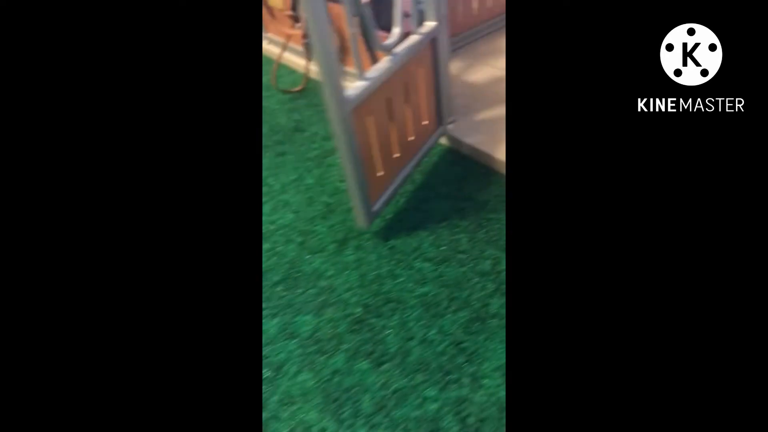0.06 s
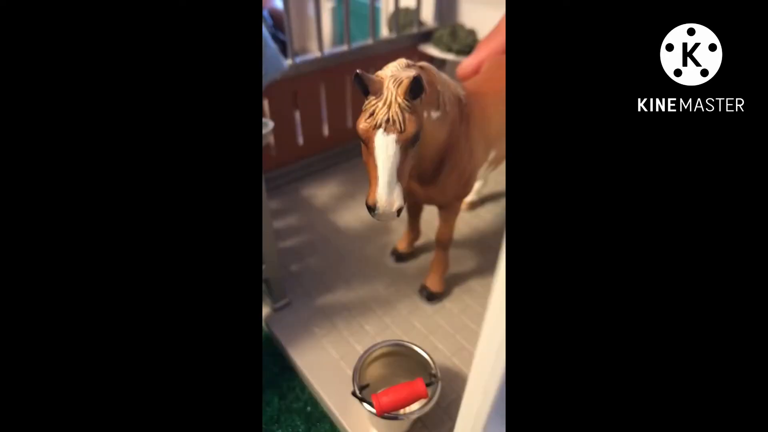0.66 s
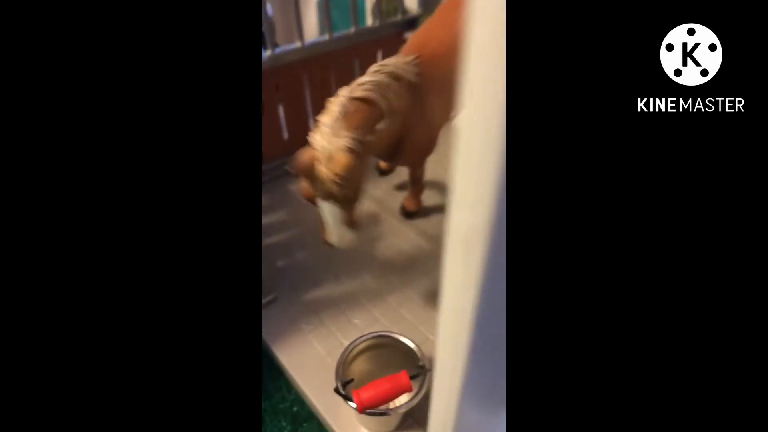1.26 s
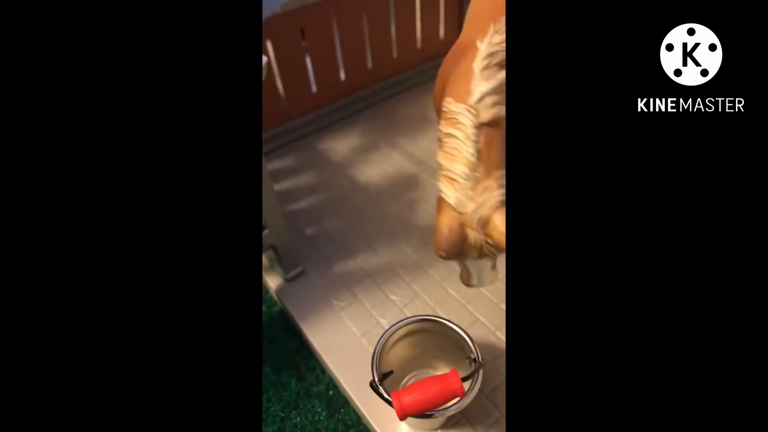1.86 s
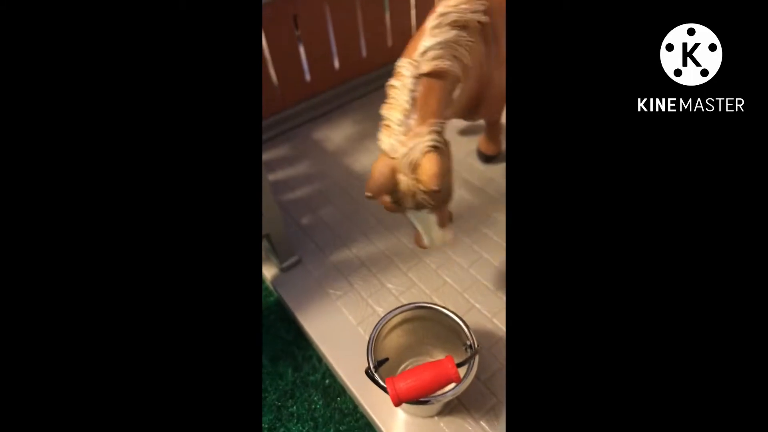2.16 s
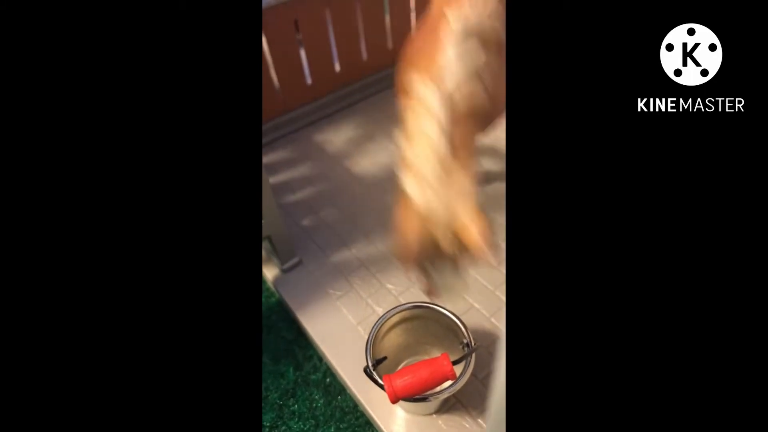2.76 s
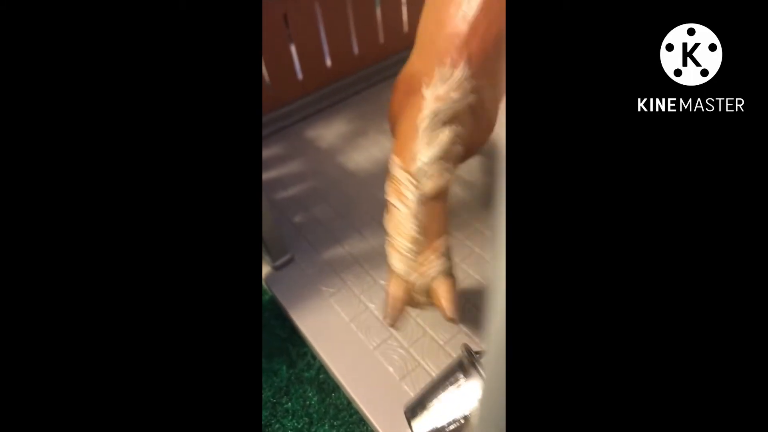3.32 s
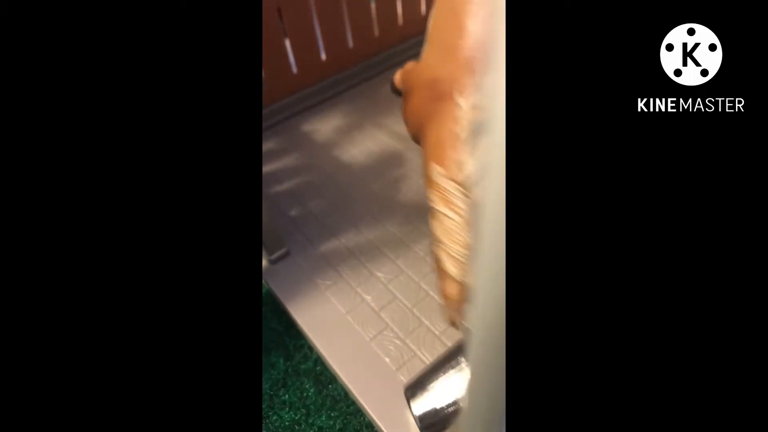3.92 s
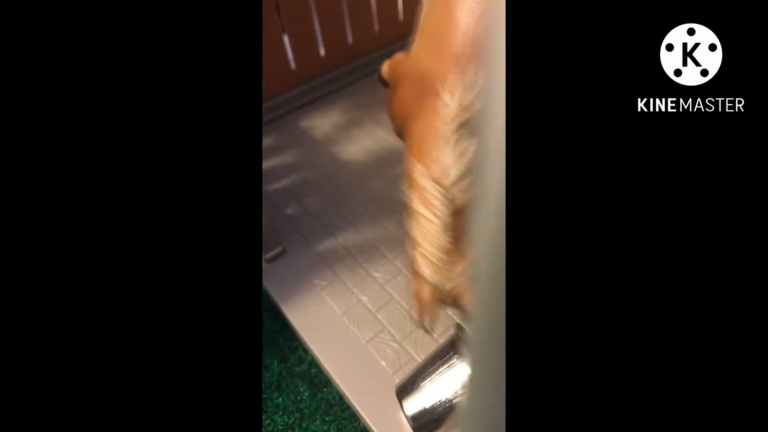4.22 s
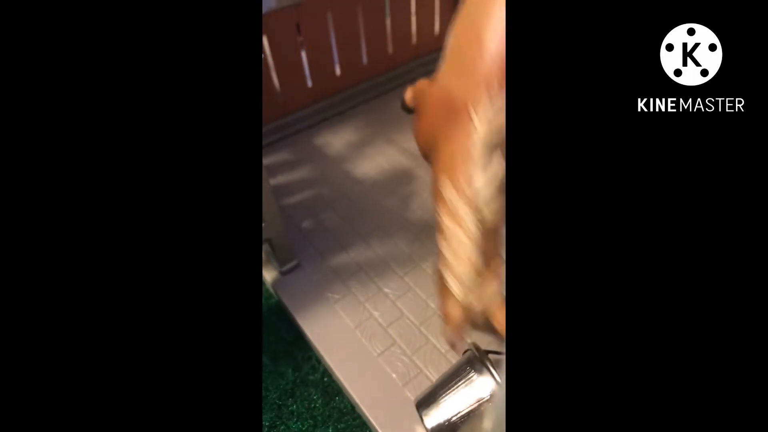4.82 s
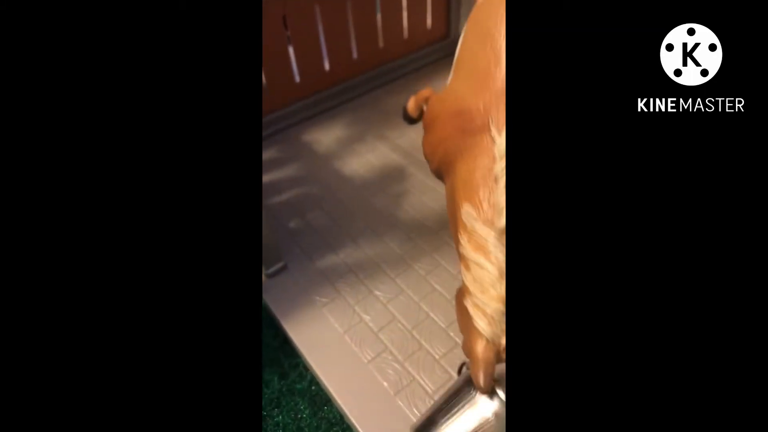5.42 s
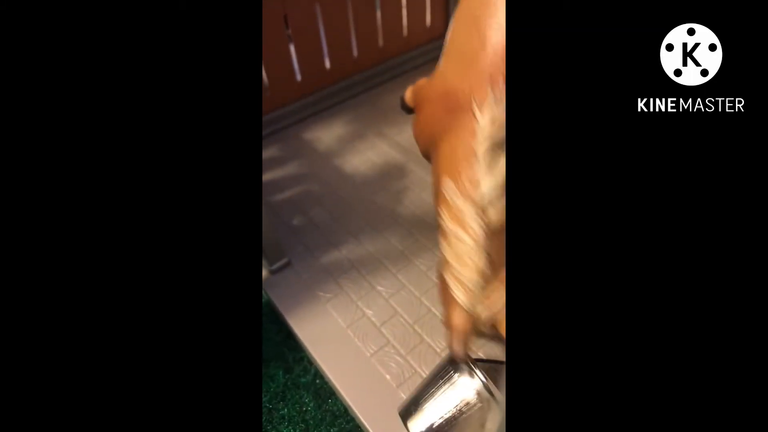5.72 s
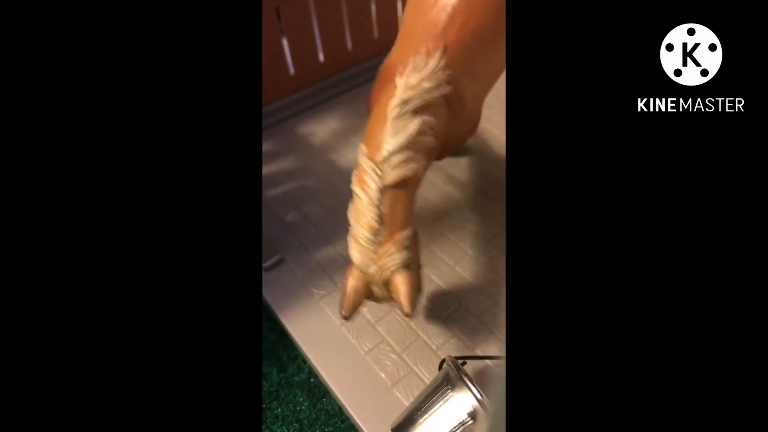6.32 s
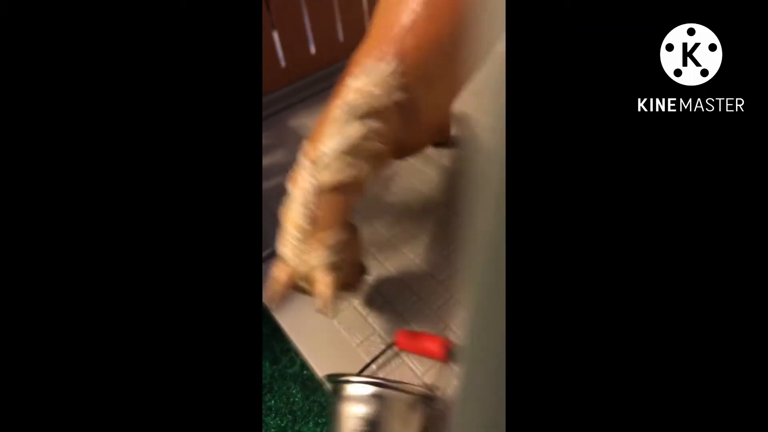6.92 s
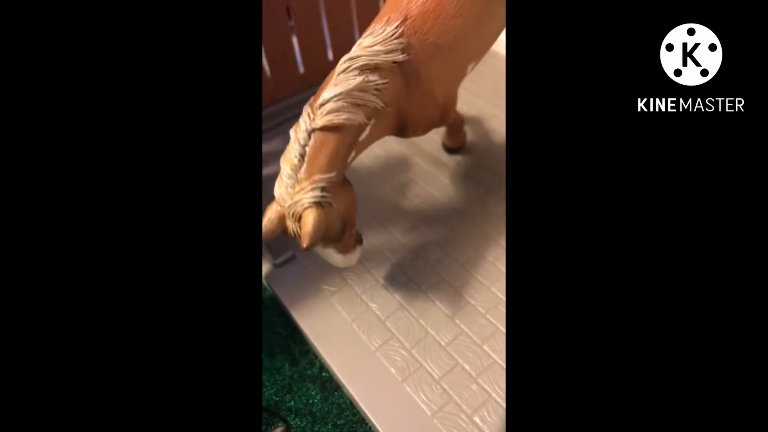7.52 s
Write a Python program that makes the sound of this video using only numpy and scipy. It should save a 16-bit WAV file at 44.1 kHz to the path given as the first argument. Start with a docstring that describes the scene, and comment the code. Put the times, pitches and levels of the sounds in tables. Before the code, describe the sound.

A plastic toy horse is walked over a hollow toy stable floor, its hooves clacking and dragging softly. After about three seconds it butts a small metal bucket over and keeps shoving it, making a run of sharp, irregular clanks with light thumps. The bucket rocks and its wire handle clinks brightly, then a few faint taps finish. The sound is close, in a small room with faint hum and hiss.

```python
"""A toy stable in a small furnished room, over faint hum and hiss. A plastic horse is walked across the
hollow floor, hooves clacking and dragging, a hand brushing its shell, the table rumbling underneath.
It butts a small metal bucket over and shoves it about: each blow thumps the floor, clanks the wall,
cracks on the rim and rebounds. Between blows the bucket rocks, and its loose wire handle clinks
with a very high shimmer."""
import sys
import numpy as np
from scipy import signal
from scipy.fft import rfft, irfft, next_fast_len
from scipy.io import wavfile
from scipy.ndimage import uniform_filter1d

SR = 44100
rng = np.random.default_rng(int(sys.argv[2]) if len(sys.argv) > 2 else 0)


def persist_wave(psi):
    """Save psi, clipped to +-1, as 16-bit WAV."""
    counts = np.round(np.clip(psi, -1, 1) * 32767).astype(np.int16)
    wavfile.write(sys.argv[1], SR, np.atleast_2d(counts).T)


N = 333881
T = np.arange(N) / SR
AGE = np.arange(SR // 3) / SR  # seconds since a hit

# plastic edges catching: (time [s], level [dB])
TICKS = [(0.169, -60), (0.807, -52), (1.356, -45.5), (1.78, -47.5), (2.59, -31), (2.658, -42), (2.739, -36),
         (3.642, -44.5), (3.743, -45), (5.234, -36.5), (6.622, -42), (6.716, -55), (6.942, -49.5)]
# hooves dragging, hand brushing: (time [s], length [s], drag [dB], brush [dB])
RUBS = [(.855, 0.16, -44, -53.5), (1.2, 0.35, -50.5, -63.5), (1.638, 0.24, -46.5, -55.5),
        (1.95, 0.53, -66.5, -65.5), (2.359, .12, -48.5, -56.5), (2.507, 0.18, -44, -59.5),
        (2.878, 0.45, -45, -65.5), (3.6, .5, -50.5, -78.5), (5.201, 0.17, -41.5, -55.5),
        (5.952, 0.089, -47, -72), (6.918, 0.17, -50.5, -64)]
# hoof steps: (time [s], clack [dB], thump gain [dB])
STEPS = [(.89, -36, -38), (.918, -41, -43), (.94, -59, -41), (1.019, -31.5, -37), (1.066, -30, -34.5),
         (1.114, -34.5, -34), (1.193, -33, -36.5), (1.246, -30, -31), (1.281, -40, -42),
         (1.494, -25, -24.5), (1.554, -43.5, -37.5), (1.824, -27, -25.5), (1.888, -33, -32.5),
         (2.574, -26.5, -33.5), (2.74, -38.5, -37), (3.242, -37.5, -39), (3.277, -24, -30.5),
         (3.292, -33, -37), (3.352, -42, -35.5), (3.412, -37, -46), (3.421, -31.5, -24.5),
         (3.797, -42.5, -40.5), (3.844, -44, -34.5), (3.906, -29, -32.5), (3.919, -26, -33.5),
         (3.995, -32.5, -40.5), (4.76, -39, -48), (5.522, -31.5, -62), (6.031, -41, -47.5),
         (6.622, -37.5, -32), (7.028, -40.5, -63.5), (7.069, -39, -63), (7.17, -39.5, -49)]
# muzzle on bucket; hardness is the rim's crack over the wall's clank: (time [s], level [dB],
# hardness [dB], thump gain [dB], handle [dB], rebound delay [s], rebound re blow [dB])
BLOWS = [(2.8265, -12, 1.5, -19, -23, .018, -4.5), (3.546, -15, -2.5, -17, -21.5, .025, -12),
         (4.251, -6.5, -5.5, -6, -33.5, .019, -17), (4.45, -10.5, -5, -11, -42.5, .019, -19),
         (4.651, -16.5, -5.5, -15.5, -34.5, .058, -12.5), (4.877, -14, -2.5, -17.5, -24, .013, -0.2),
         (5.136, -17.5, 1, -28, -26.5, .016, 5), (5.436, -15, 3, -23, -23.5, .016, 4.5),
         (5.65, -12, 0.5, -19, -27, .01, -12), (5.84, -10, -0.5, -16.5, -26, .009, -4.5),
         (6.443, -13, 4, -22, -15.5, .013, -3.5), (6.801, -22, -6, -16.5, -32, 0.012, 1)]
# the bucket rocking on the floor: (time [s], level [dB], hardness [dB])
KNOCKS = [(2.862, -29.5, 1), (2.917, -26, -10), (2.942, -37.5, -3.5), (2.975, -20.5, 6.5),
          (3.04, -30.5, -9), (3.052, -33.5, 7.5), (3.136, -30.5, -4.5), (3.145, -28.5, -7),
          (3.541, -35, -8), (3.874, -15.5, -5.5), (3.933, -16, -7.5), (4.327, -27.5, -4),
          (4.345, -25.5, -15.5), (5.256, -23, -3), (5.291, -22.5, -5.5), (5.309, -17.5, -4.5),
          (5.39, -16, -2.5), (5.547, -25, -9.5), (5.95, -36.5, -17), (6.249, -33, -14.5), (6.449, -11, 1),
          (6.485, -21.5, -6), (6.834, -16.5, -5.5), (6.874, -17, -3), (7.012, -41, 2.5)]
# the handle swinging in its lugs: (time [s], shimmer [dB], lower ring [dB])
CLINKS = [(2.862, -28, -38), (2.918, -33.5, -37.5), (2.974, -24.5, -25), (3.049, -31, -42),
          (3.12, -33, -36.5), (3.145, -38, -50), (3.575, -29.5, -36.5), (3.874, -43, -36),
          (3.933, -56, -35), (4.299, -32.5, -53), (4.711, -33.5, -43), (4.925, -37.5, -56),
          (5.266, -26.5, -53), (5.334, -21.5, -51), (5.421, -18.5, -48), (5.586, -37, -62),
          (6.238, -37.5, -50), (6.25, -41.5, -50.5), (6.824, -18, -36), (6.835, -34, -27),
          (7.09, -34.5, -48), (7.206, -34, -48), (7.228, -42, -41.5), (7.241, -36.5, -53)]

# What rings: (frequency [Hz], relative level [dB], t60 before extra damping [s])
HORSE_MODES = [(628, -11.5, 0.21), (772.4, 2.5, 0.04), (1121, 2.5, 0.068), (1234, -5, 0.02),
               (1360, -5, 0.043), (1595, -1, 0.015)]  # hooves and muzzle
FLOOR_MODES = [(193, -10, 0.095), (246, -2, .07), (288.5, 0.5, 0.063), (322.8, -4.5, 0.11)]  # hollow stable floor
TABLE_MODES = [(80.5, -4, 0.03), (109, -2.5, 0.12), (128, -2, 0.14)]  # table underneath
BARREL_MODES = [(342, -1, 0.15), (426, -2.5, .045), (554, 1.5, 0.047)]  # the horse's hollow body
WALL_MODES = [(665.4, -3, 0.14), (730, -6, 0.14), (1140, -2, 0.14), (1385, -1, 0.084), (1486, -0.5, 0.13),
              (1528, -4.5, 0.026), (1737, 1, .06), (1760, 1.5, 0.01), (1900, -1, 0.027), (2115, 1.5, 0.058)]  # bucket wall
RIM_MODES = [(2550, -4, 0.097), (2870, -1, 0.091), (3070, -2, .05), (3365, 0, 0.058), (4080, -7.5, 0.025),
             (4517, -7, 0.065), (4600, -10, 0.051)]  # bucket rim
HANDLE_MODES = [(5820, -8, .06), (5933, -9.5, 0.064), (6420, 0.5, 0.084), (5940, -9, .04)]  # the wire handle's lower ring
SHIMMER_MODES = [(11830, -4.5, 0.089), (13550, 6, 0.065), (13360, -1.5, 0.03)]  # its high shimmer
MOUTH_MODES = [(3920, 2, 0.029), (4180, -6, .03)]  # the bucket's open mouth

# EQ curves for the noise layers: (frequency [Hz], relative level [dB])
AIR_EQ = [(20, -21.5), (40, -10.5), (55, 2), (72, -7), (115, -5), (180, -8), (290, -7.5), (450, -16),
          (800, -22), (1600, -25.5), (3200, -31), (6400, -36.5), (12800, -38)]  # room rumble and hiss
TAP_EQ = [(1500, -28), (2400, -1.5), (3000, -1), (4300, -6), (5000, -9.5), (6200, -14), (10000, -31),
          (15500, -20.5)]  # the plastic's bright snap
CLACK_EQ = [(200, -25.5), (450, -10), (700, -3), (950, -3), (1200, -2.5), (1700, 3), (2150, -4.5),
            (2400, -18), (3500, -33.5)]  # hollow midrange of a hit
DRAG_EQ = [(60, -9), (120, 10), (190, 3), (310, 5.5), (450, -5), (700, -1.5), (1300, -1.5), (1900, -9),
           (2400, -18), (3200, -14.5), (7000, -27)]  # hooves on the floor
BRUSH_EQ = [(800, -18.5), (2000, 2.5), (3200, -5), (4800, -2.5), (6500, -4), (9000, -8.5), (11000, -9.5),
            (15500, -11)]  # hand on plastic
RUMBLE_EQ = [(25, -26), (55, 3.5), (80, -0.5), (115, 6), (150, -4.5), (220, -19.5), (500, -52),
             (1500, -85.5)]  # the table's low end
CRACK_EQ = [(1500, -34.5), (2400, -5), (3200, 0.5), (4200, -8.5), (5000, -12.5), (5900, -8), (7300, -10),
            (8000, -11.5), (9500, -12), (10400, -18), (11300, -14), (14500, -11), (16000, -18.5)]  # thin metal's attack

# the room's reverb: (octave centre [Hz], band gain [dB], t60 [s])
REVERB_BANDS = [(62, -5.5, .4), (129, -6.5, 0.23), (246, -16, 0.24), (493, -11, 0.22), (990, -16.5, 0.23),
                (2070, -25, 0.23), (4000, -21, 0.15), (8000, -30.5, 0.46), (16000, -28.5, .11)]


def undb(db):
    """Decibels to gain."""
    return 10 ** (np.asarray(db) / 20)


def add(out, s, sound):
    """Mix a sound in at s seconds."""
    i = int(s * SR)
    out[i:i + len(sound)] += sound[:len(out) - i]


def peak(x, db=0):
    """Set the RMS level of the loudest 5 ms."""
    return x * undb(db) / np.sqrt(uniform_filter1d(x * x, size=220).max())


def fade(t60, size=6000):
    """Exponential decay, size samples long."""
    return np.exp(-np.log(1000) * AGE[:size] / t60)


def colour(x, eq, tilt_db=0):
    """Minimum-phase EQ through (Hz, dB) points, tilted by tilt_db per octave."""
    n = next_fast_len(len(x) + 2048)
    octave = np.log2(np.maximum(np.fft.rfftfreq(n, 1 / SR), 1))
    hz, db = np.transpose(eq)
    gain_db = np.interp(octave, np.log2(hz), db + tilt_db * np.log2(hz / hz[0]))
    cepstrum = irfft(np.log(undb(gain_db)), n)
    cepstrum[1:n // 2] *= 2
    cepstrum[n // 2 + 1:] = 0
    return irfft(rfft(x, n) * np.exp(rfft(cepstrum)), n)[:len(x)]


def room_tone(gain_db=-56.5, hum_hz=55.5, hum_db=-2, dip_at_s=.553, dip_half_s=.05, dip_fade_s=.14):
    """A bed of rumble, hiss and low hum; the level dips briefly once."""
    noise = colour(rng.standard_normal(N), AIR_EQ)
    hum = undb(hum_db) * np.sqrt(2) * np.sin(2 * np.pi * hum_hz * T)
    dip = np.clip((np.abs(T - dip_at_s) - dip_half_s) / dip_fade_s, undb(-36), 1)
    return (noise / noise.std() + hum) * undb(gain_db) * dip


def burst(eq, t60, tilt_db=0, size=6000):
    """Many short resonances at once: coloured noise that dies quickly."""
    return peak(colour(rng.standard_normal(size) * fade(t60, size), eq, tilt_db))


def plastic_ticks():
    """Plastic edges catch and let go: a sharp snap over a hollow clack."""
    out = np.zeros(N)
    for s, db in TICKS:
        snap = burst(TAP_EQ, t60=.047, tilt_db=5.5)
        clack = undb(3.5) * burst(CLACK_EQ, t60=.064)
        add(out, s, undb(db) * (snap + clack))
    return out


def shell_rub(friction, eq, spread_db):
    """Friction rings the thin plastic shell; each contact spot favours other resonances."""
    shell = rng.standard_normal(1500) * fade(t60=.027, size=1500)
    resonance = signal.fftconvolve(friction, shell / np.linalg.norm(shell))[:len(friction)]
    hz, db = np.transpose(eq)
    spot_eq = np.column_stack([hz, db + spread_db * rng.standard_normal(len(db))])
    rub = colour(friction + resonance, spot_eq)
    return rub / rub.std()


def rubbing(slips_per_s=160, drag_grip_db=4, brush_grip_db=2.5):
    """Hooves drag and a hand brushes: each stroke swells and fades as the plastic sticks and slips."""
    out = np.zeros(N)
    for s, length, drag_db, brush_db in RUBS:
        drag, brush, slips = rng.standard_normal((3, SR // 2))
        age = np.arange(min(int(length * SR), SR // 2)) / SR
        grip = np.interp(age * slips_per_s, np.arange(len(slips)), slips)
        drag = shell_rub(drag[:len(age)] * undb(drag_grip_db * grip), DRAG_EQ, spread_db=2.5)
        brush = shell_rub(brush[:len(age)] * undb(brush_grip_db * grip), BRUSH_EQ, spread_db=6.5)
        swell = np.sin(np.pi * age / length)
        add(out, s, (drag * undb(drag_db) + brush * undb(brush_db)) * swell)
    return out


def ring(modes, scatter_db, detune, size=6000):
    """Decaying modes; their strength, polarity and pitch depend on where the hit lands."""
    hz, db, t60 = np.transpose(modes)[:, :, None]
    strength, shift, side = rng.standard_normal((len(modes), 3)).T[:, :, None]
    gains = np.sign(side) * undb(db + scatter_db * strength)
    waves = np.sin(2 * np.pi * hz * (1 + detune * shift) * AGE[:size])
    return peak((gains * waves * fade(t60, size)).sum(axis=0))


def attack(rise_s, size=6000):
    """Contact force takes a moment to build, rounding off the transient."""
    return 1 - np.exp(-AGE[:size] / rise_s)


def floor_thump(table_db, table_lag_s=.009):
    """The hollow floor booms and the table under it follows."""
    floor = ring(FLOOR_MODES, scatter_db=3.5, detune=.03) * attack(.00067)
    table = ring(TABLE_MODES, scatter_db=2.5, detune=.038)
    bloom = 1 - np.exp(-(AGE[:len(table)] / table_lag_s) ** 2)
    return peak(floor) + peak(table * bloom, table_db)


def hoof_steps():
    """Plastic hooves clack and snap on top; the floor and the horse's hollow body give the weight."""
    out = np.zeros(N)
    onset = attack(.00039)
    for s, clack_db, thump_db in STEPS:
        clack = ring(HORSE_MODES, scatter_db=4.5, detune=.04)
        clack += undb(-2) * burst(CLACK_EQ, t60=.05, tilt_db=-2.5)
        floor = undb(-3.5) * floor_thump(table_db=-2.5)
        barrel = undb(.5) * ring(BARREL_MODES, scatter_db=2, detune=.053) * onset
        snap = undb(clack_db - 14.5) * burst(TAP_EQ, t60=.069)
        add(out, s, undb(thump_db) * (floor + barrel) + peak(clack * onset, clack_db) + snap)
    return out


def table_rumble(step_send_db=-15, blow_send_db=-19.5, tip_db=-29.5):
    """The table rumbles on after steps and blows, with an extra shake as the bucket tips over."""
    out = np.zeros(N)
    shakes = [(BLOWS[0][0], tip_db)]
    shakes += [(s, db + hardness_db + blow_send_db) for s, db, hardness_db, *_ in BLOWS]
    shakes += [(s, thump_db + step_send_db) for s, _, thump_db in STEPS]
    for s, db in shakes:
        add(out, s, undb(db) * burst(RUMBLE_EQ, t60=.45, size=14000))
    return out


def chatter(sound, span_s=.016, again_db=-5, count=4):
    """Loose parts touch again, more softly, at random moments within span_s."""
    out = sound.copy()
    for lag in rng.random(count):
        add(out, lag * span_s, undb(again_db) * sound)
    return out


def settle(sound, hold_s, buzz_db=3, buzz_per_s=700):
    """The ringing handle buzzes against its lugs, then is choked as it comes to rest."""
    age = AGE[:len(sound)]
    buzz = np.interp(age * buzz_per_s, np.arange(200), rng.standard_normal(200))
    return sound * undb(buzz_db * buzz) * np.exp(-(age / hold_s) ** 2)


def wire_handle(shimmer_db, ring_db):
    """The wire chatters in its lugs: a ring with a very high shimmer above it."""
    low = settle(chatter(ring(HANDLE_MODES, scatter_db=6.5, detune=.0013)), hold_s=.17)
    high = settle(chatter(ring(SHIMMER_MODES, scatter_db=3.5, detune=.0012)), hold_s=.069)
    return peak(low, ring_db) + peak(high, shimmer_db)


def bucket_hit(db, hardness_db, handle_db, wall_damp_s=.47, rim_damp_s=.42):
    """A hit clanks the wall, skids on the rim and jolts the handle; the leaning horse damps the metal."""
    tilt_db = -2.5 + .9 * hardness_db  # harder hits crack brighter
    onset = attack(.00043)
    wall = ring(WALL_MODES, scatter_db=1.5, detune=.02) * fade(wall_damp_s)
    wall += undb(2) * burst(CLACK_EQ, t60=.065, tilt_db=.5)
    scrape = burst(CRACK_EQ, t60=.029, tilt_db=tilt_db)
    skid = peak(chatter(scrape, span_s=.0054, again_db=-11.5, count=3))
    rim = ring(RIM_MODES, scatter_db=0, detune=.013) * fade(rim_damp_s)
    crack = undb(-6.5 - tilt_db / 2) * rim + skid
    handle = wire_handle(shimmer_db=handle_db, ring_db=handle_db - 11)
    return peak(wall * onset, db) + peak(crack * onset, db + hardness_db) + handle * onset


def muzzle_blows():
    """The muzzle butts the bucket, which rebounds; floor and muzzle thump on the stronger hit."""
    out = np.zeros(N)
    for s, db, hardness_db, thump_db, handle_db, rebound_s, rebound_db in BLOWS:
        add(out, s, bucket_hit(db, hardness_db, handle_db))
        add(out, s + rebound_s, bucket_hit(db + rebound_db, hardness_db, handle_db + rebound_db))
        floor = floor_thump(table_db=-17)
        muzzle = undb(-4) * ring(HORSE_MODES, scatter_db=1.5, detune=.03) * fade(t60=.12)
        stronger_s = s + rebound_s if rebound_db > 0 else s
        add(out, stronger_s, undb(thump_db) * (floor + muzzle))
    # the bucket's mouth sings only on the first blow, while it stands free
    add(out, BLOWS[0][0], undb(-9) * ring(MOUTH_MODES, scatter_db=1.5, detune=0))
    return out


def bucket_rocking():
    """The bucket rocks against the floor: metal knocks with a light thump beneath."""
    out = np.zeros(N)
    for s, db, hardness_db in KNOCKS:
        add(out, s, bucket_hit(db, hardness_db, handle_db=db + hardness_db - 13))
        add(out, s, undb(db - 18) * floor_thump(table_db=-14))
    return out


def handle_clinks():
    """The loose handle swings into its lugs with a bright tick and ring, then touches twice more."""
    out = np.zeros(N)
    for s, shimmer_db, ring_db in CLINKS:
        tick = undb(shimmer_db - 4) * burst(CRACK_EQ, t60=.02, tilt_db=4.5)
        clink = tick + wire_handle(shimmer_db, ring_db)
        add(out, s, chatter(clink, span_s=.028, again_db=-16, count=2))
    return out


def room_reverb(x, build_s=.014):
    """Diffuse echoes build behind the direct sound, each octave dying at its own rate."""
    response = 0
    for hz, db, t60 in REVERB_BANDS:
        edges_hz = [hz / np.sqrt(2), min(hz * np.sqrt(2), SR / 2 - 1000)]
        band = signal.butter(3, edges_hz, "band", fs=SR, output="sos")
        echoes = signal.sosfilt(band, rng.standard_normal(len(AGE)))
        shape = fade(t60, len(AGE)) * (1 - np.exp(-(AGE / build_s) ** 2))
        response = response + undb(db) * echoes * shape / np.linalg.norm(shape)
    return x + signal.fftconvolve(x, response)[:N]


def scene():
    """Close mono mix: the toys feed the reverb; table rumble and room tone stay dry."""
    horse = hoof_steps() + plastic_ticks() + rubbing()
    bucket = muzzle_blows() + bucket_rocking() + handle_clinks()
    return (room_reverb(horse + bucket) + table_rumble() + room_tone())[None]


def record(dry, top_hz=16000):
    """The hardest blows overload and clip; a steep low-pass cuts the top."""
    lowpass = signal.ellip(10, .2, 70, top_hz, fs=SR, output="sos")
    return signal.sosfilt(lowpass, np.clip(dry, -1, 1))


dry = scene()
out = record(dry)
persist_wave(out)
```